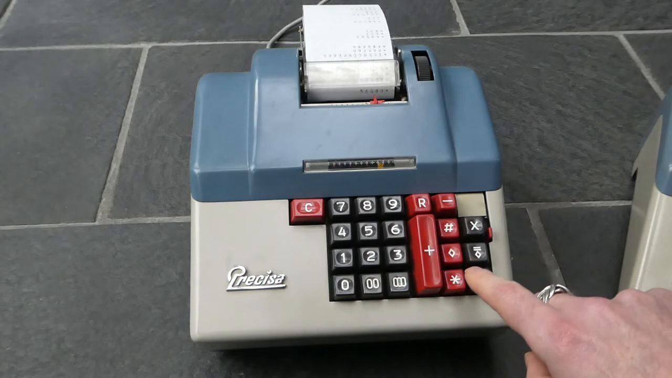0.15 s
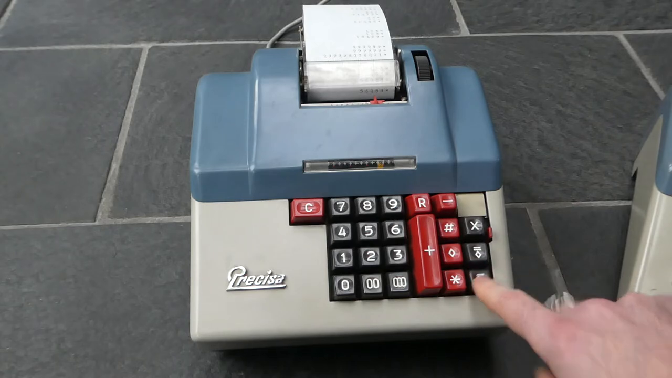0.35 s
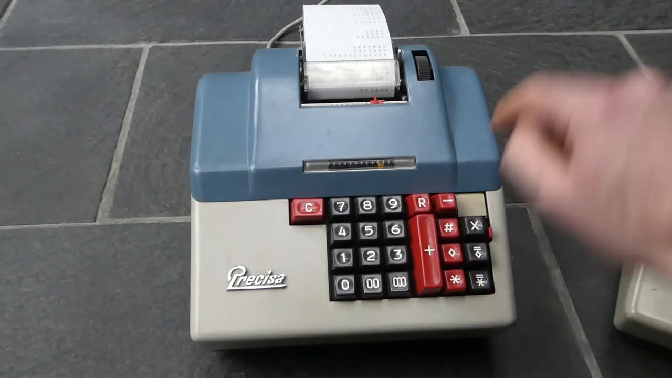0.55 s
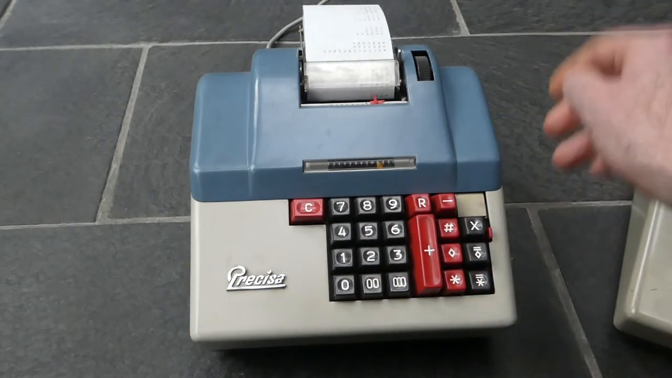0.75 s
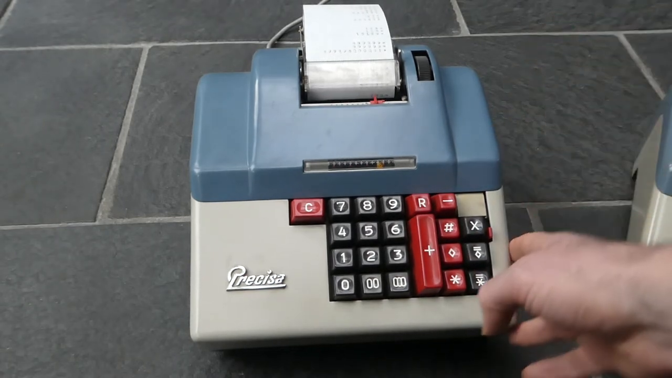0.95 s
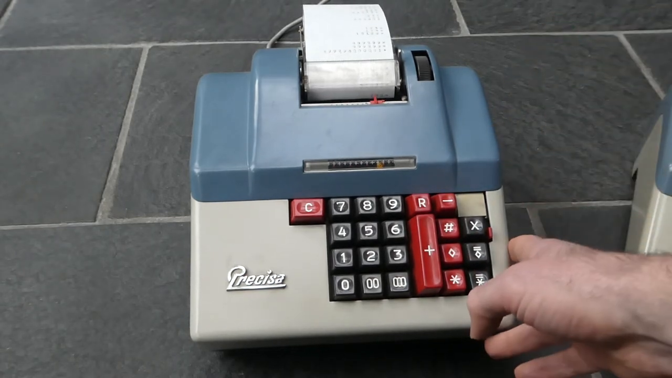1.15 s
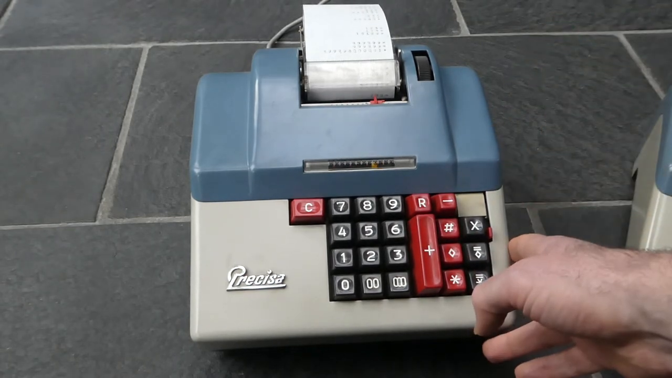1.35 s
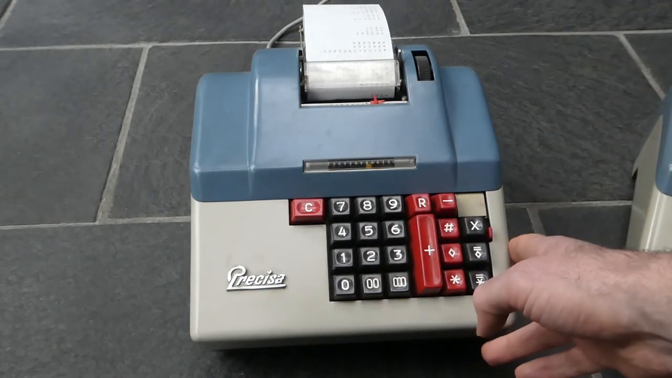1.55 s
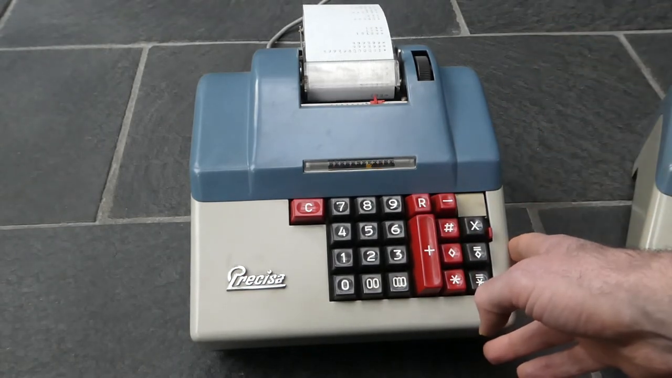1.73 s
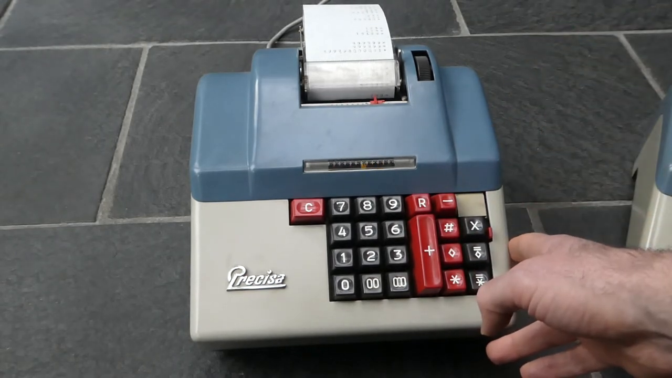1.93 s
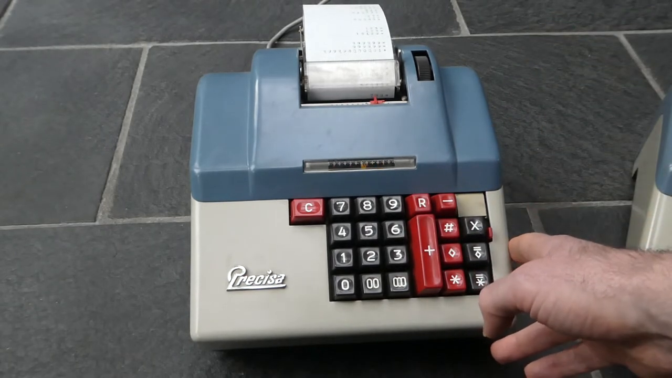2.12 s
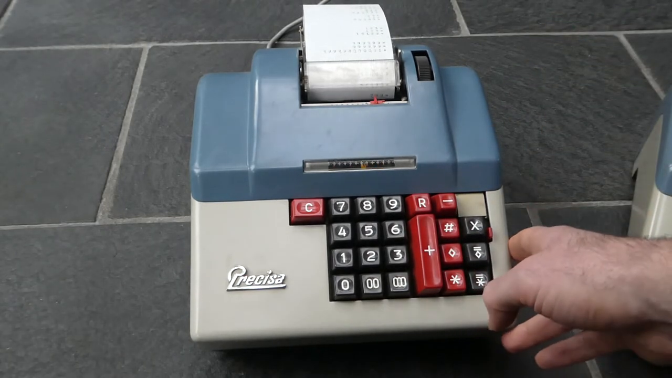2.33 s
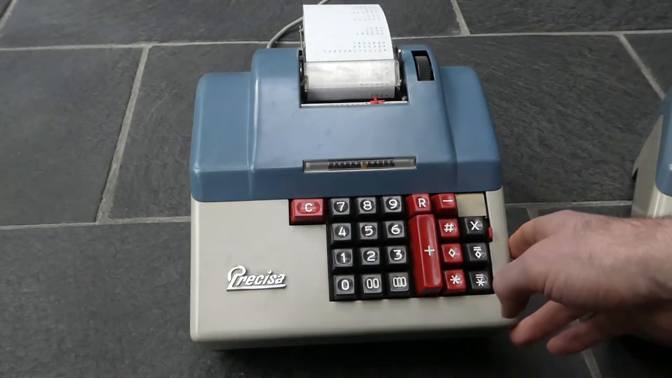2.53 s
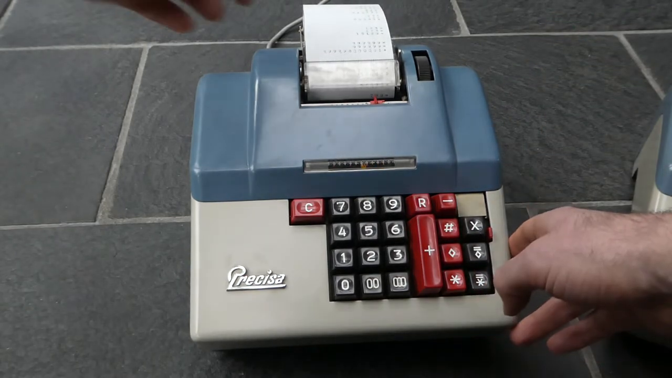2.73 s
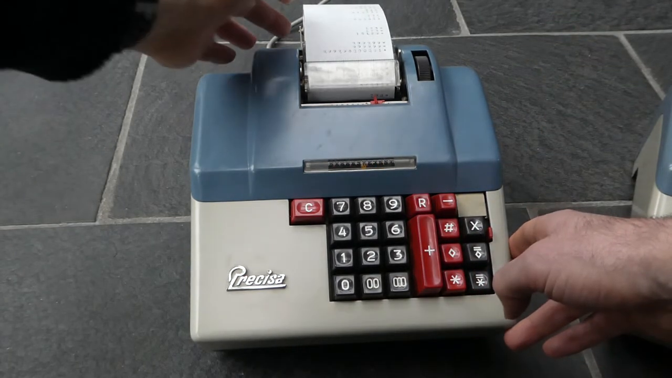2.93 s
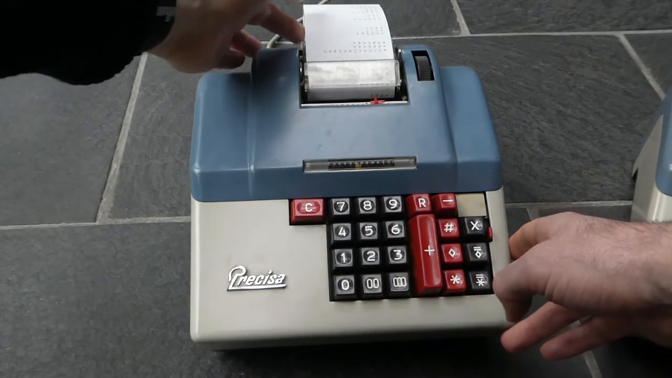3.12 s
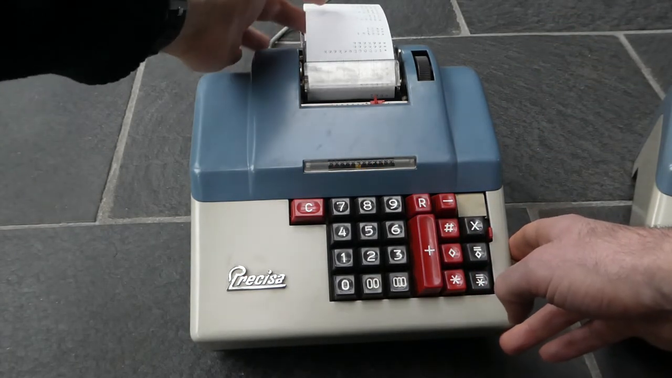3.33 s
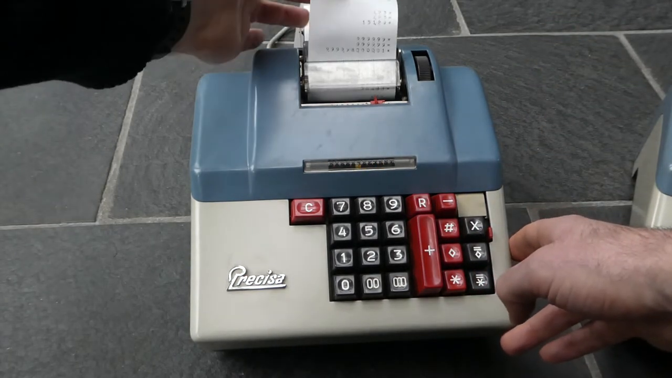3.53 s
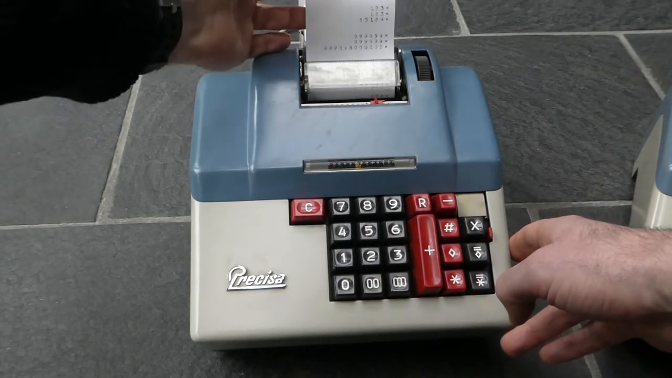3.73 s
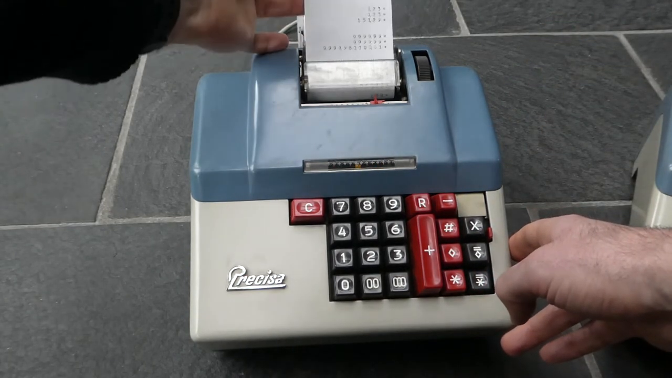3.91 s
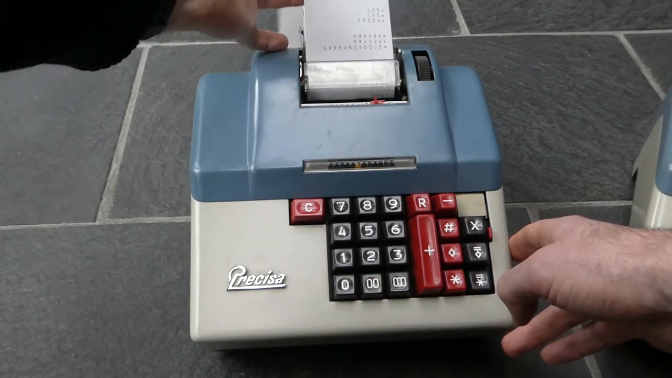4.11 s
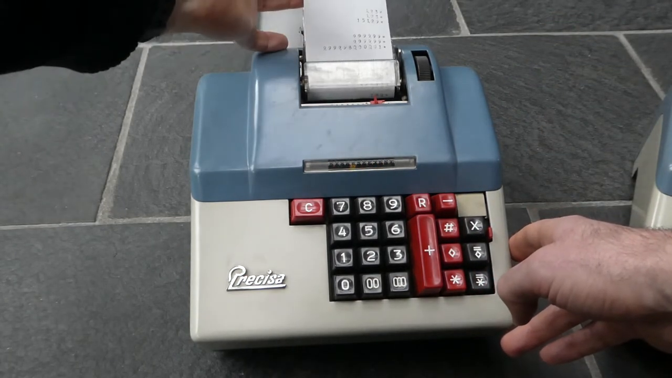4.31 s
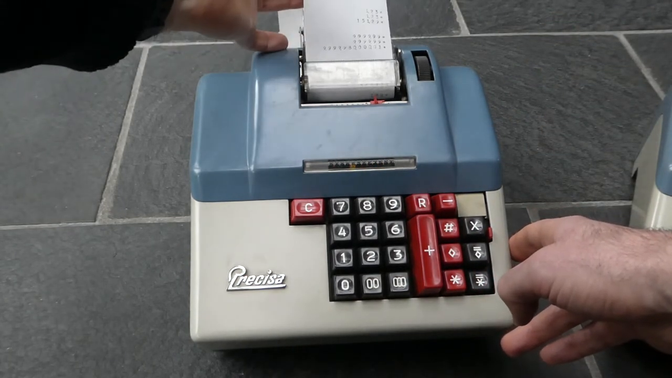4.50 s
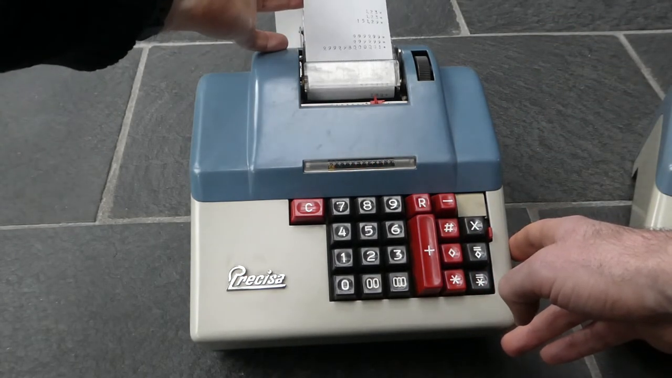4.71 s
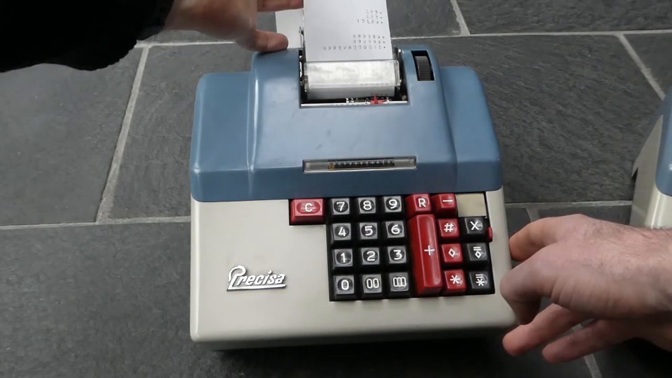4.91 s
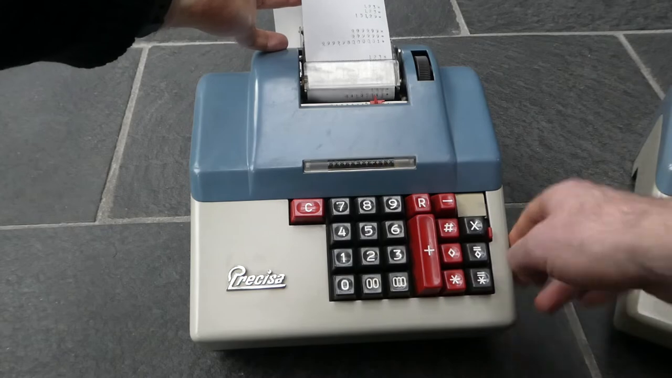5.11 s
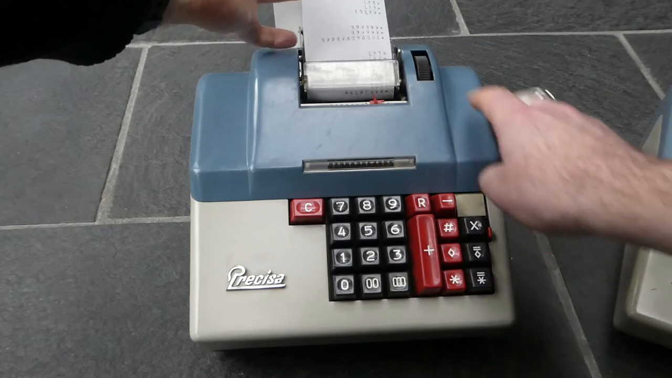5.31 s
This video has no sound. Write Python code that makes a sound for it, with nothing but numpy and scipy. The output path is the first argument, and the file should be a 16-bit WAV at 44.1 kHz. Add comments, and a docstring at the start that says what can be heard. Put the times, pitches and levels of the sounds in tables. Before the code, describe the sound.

An old electric calculator runs a long calculation on stone tiles: sudden snap, then bright dense metallic clatter in a steady galloping cycle, with grainy gear whirr, hollow case hum and short fluttering pings. It ends abruptly, leaving quickly fading reflections, faint hum and quiet room hush, with one small drop of a loose part. Heard close in stereo, reflections slightly wider.

```python
"""An electric adding machine on a stone floor runs through cycles of about a third of a second, then stops.
Levers and racks slam in short noise rattles that strike the modes of the frame; single bars ring out.
A steel pawl pings in fluttering modes, jolts swell the low tones of the case, gears whirr as grainy noise.
A hard room answers with decaying echoes over a faint, wide hush of coloured noise.
A stereo microphone pair hears it: machine in the middle, reflections and hush spread wide."""
import sys
import numpy as np
from scipy import signal
from scipy.fft import rfft, irfft
from scipy.io import wavfile

SR = 44100
rng = np.random.default_rng(int(sys.argv[2]) if len(sys.argv) > 2 else 0)


def digitize_waveform(pressure):
    """Quantize a signal to 16-bit integers and store it at the path in sys.argv[1].

    Rows of a 2-D input are taken as channels; values are limited to [-1, 1].
    """
    field = np.atleast_2d(pressure).T
    bounded = np.clip(field, -1, 1)
    quanta = np.round(bounded * 32767).astype(np.int16)
    wavfile.write(sys.argv[1], SR, quanta)


N = 240400

# distant house noise: (frequency [Hz], relative level [dB]); side gain against mid: (frequency [Hz], gain [dB])
HUSH_COLOUR, HUSH_SPREAD = [(12, -55), (40, -29), (90, -14.5), (200, -13), (297, -4.5), (361, -15),
                            (506, -11), (863, -21), (2600, -20), (2770, -15.5), (2950, -20), (3800, -23),
                            (5670, -27), (12500, -31.5), (16500, -42)], [(60, 4.5), (700, 9), (1290, 5.5), (2380, 1), (4400, -5.5)]
HUSH_MID_DB = -63.5  # rms of the mid signal
# echoes of tiles and walls: (octave centre [Hz], t60 [s], level [dB])
ROOM_OCTAVES = [(104, 0.81, -0.5), (190, 0.54, -4.5), (332, 1, -14.5), (643, 0.77, -5.5), (1340, 0.653, -8),
                (2980, 0.74, -13.5), (4970, 0.8, -13), (11600, 0.45, -15.5)]
# side gain of the reflections: (frequency [Hz], gain [dB])
REFLECTION_SPREAD = [(60, -6), (200, -25), (380, -18.5), (700, -6.5), (1290, -11.5), (8120, -13),
                     (15000, -5.5)]
# tilt of the microphone pair: (frequency [Hz], left minus right [dB])
LEAN = [(200, 1), (380, 2), (700, 0), (1290, -1.5), (4400, -.5), (8120, 1.5)]
TOP_HZ = 16000  # upper limit of the sound

# gears and motor: (time [s], whirr level [dB], case hum level [dB])
RUN = [(0.359, -35, -51), (.395, -37, -44), (.45, -36, -39), (.55, -33.5, -42), (1.0, -36.5, -41.5),
       (2.6, -38, -42), (3.3, -40.5, -44), (4.6, -37.5, -42), (5.01, -35.5, -44.5), (5.16, -36, -41.5),
       (5.21, -45, -53)]
# faint hum after the stop: (start [s], frequency [Hz], width [Hz], level [dB])
COAST = (5.15, 365, 16, -59)
# hum modes of the case: (frequency [Hz], width of each filter pass [Hz], level [dB])
CASE_MODES = [(265.7, 33, -11.5), (326.9, 49.4, -1.5), (361.3, 25, -3), (394.3, 25.3, -4.5)]
# colour of blows and gears: (frequency [Hz], relative level [dB])
METAL_COLOUR = [(260, -32), (480, 4.5), (640, 4.5), (914, 2.5), (1550, 8.5), (2330, 7), (2920, 12),
                (3710, 4.5), (4580, 4), (5600, 5), (7310, 8.5), (8600, 4), (10000, 6.5), (11400, 0),
                (12500, -6.5), (15300, -13), (16500, -60)]
# frame and lever modes: (frequency [Hz], level [dB], t60 [s])
FRAME_MODES = [(1430, -6, 0.05), (1505, 1.5, 0.03), (1770, -6, 0.05), (2134, -6, 0.02), (2920, 2, 0.035),
               (3300, 2, 0.025), (4472, 2, 0.03), (4800, -2, 0.04), (5400, 5, 0.025), (6280, 3, 0.02),
               (6700, 5, 0.025), (9700, 5, 0.012), (10800, 14, 0.006)]

# jolts that make the case boom: (loudest time [s], level [dB], pitch [Hz], swell and fade constant [s])
JOLTS = [(0.401, -33, 332, 0.0095), (0.523, -19, 348.4, 0.0086), (0.561, -23, 354, 0.017),
         (0.648, -32, 353, 0.0143), (0.696, -25.5, 329.8, 0.01), (0.731, -28.5, 339, 0.012),
         (0.766, -28, 353, 0.0068), (0.815, -33, 350, 0.012), (0.84, -30.5, 351, 0.0085),
         (0.869, -28.5, 345, 0.0098), (0.924, -29.5, 361, 0.0072), (0.962, -27.5, 350, 0.0079),
         (1.006, -23.0, 343, 0.015), (1.074, -27.5, 362, 0.019), (1.11, -30.5, 322, 0.0132),
         (1.128, -25, 346, 0.008), (1.166, -26.5, 345, 0.0082), (1.226, -31.5, 356.5, 0.008),
         (1.26, -30.5, 345, 0.015), (1.321, -30, 352, 0.016), (1.394, -26.5, 371, 0.023),
         (1.433, -30.0, 362, 0.01), (1.549, -27, 322, 0.0066), (1.63, -26.0, 332, 0.0189),
         (1.699, -23.5, 378.6, 0.0164), (1.737, -29, 362, 0.0056), (1.773, -30.0, 356, 0.0069),
         (1.796, -28, 340, 0.0094), (1.818, -34, 338, 0.015), (1.857, -29, 361, 0.0088),
         (1.89, -35, 336, 0.006), (1.928, -22.5, 349, 0.015), (1.999, -27.5, 351, 0.0091),
         (2.13, -29, 356, 0.008), (2.171, -26, 357, 0.0076), (2.248, -27.5, 333, 0.0224),
         (2.291, -32.5, 336, 0.013), (2.317, -28, 362, 0.0124), (2.36, -33, 366, 0.0085),
         (2.451, -29.5, 336, 0.0089), (2.492, -32.0, 340, 0.014), (2.559, -26, 358, 0.018),
         (2.628, -24, 371, 0.0088), (2.678, -29.5, 367, 0.011), (2.798, -31, 350, 0.011),
         (2.825, -34, 337, 0.01), (2.847, -29, 351, 0.0084), (2.868, -23.5, 336.4, 0.015),
         (2.902, -32, 337.4, 0.011), (2.931, -28.5, 360, 0.009), (3.099, -26.5, 328, 0.01),
         (3.167, -27.5, 361, 0.011), (3.247, -25, 365, 0.013), (3.293, -30, 334, 0.0088),
         (3.488, -26.5, 353.7, 0.0088), (3.559, -25, 350, 0.0093), (3.602, -31.5, 362, 0.008),
         (3.636, -31, 323, 0.013), (3.798, -26.5, 335, 0.026), (3.873, -23.5, 361, 0.0086),
         (3.929, -31, 340, 0.015), (4.102, -26, 337.7, 0.017), (4.176, -29.5, 359, 0.0074),
         (4.194, -27.5, 338.4, 0.012), (4.214, -30, 370, 0.008), (4.266, -29, 354, 0.0066),
         (4.357, -27, 347, 0.0072), (4.413, -27.5, 336, 0.011), (4.475, -27.5, 362, 0.012),
         (4.516, -30, 330, 0.0112), (4.579, -31, 367, 0.0085), (4.715, -24, 343, 0.0089),
         (4.839, -22, 352, 0.0081), (4.854, -29.5, 383, 0.015), (4.919, -27.0, 350, 0.0087),
         (4.966, -30.5, 348, 0.015), (4.993, -31.0, 356, 0.009), (5.035, -25, 323.5, 0.0117),
         (5.053, -34, 349, 0.0068), (5.102, -30.5, 376, 0.008), (5.126, -30.5, 353, 0.0092)]
# colour of the thud into the floor: (frequency [Hz], relative level [dB])
THUD_COLOUR = [(12, -48), (20, -32), (59, -23), (108, -6.5), (187, -7), (250, 0.5), (290, 0.5), (480, -46)]
THUD_DB = -58.5  # rms of all thuds over the whole scene

# pawl pings: (time [s], level [dB], lowest mode over middle [dB], upper modes over middle [dB])
PINGS = [(1.1714, -32.5, -6, -26), (1.485, -31.5, 4, -6), (1.79, -35, 3.5, 0), (2.0996, -63, -14, -12),
         (2.411, -31.5, -5, -3), (2.7237, -31, -16, -6), (3.027, -27.5, -26.5, -4),
         (3.3404, -30.5, -13, 1.5), (3.6583, -30.5, -11, 0.5), (3.9634, -27, -10, -5),
         (4.2692, -31.5, -14, -6), (4.56, -38, -3.5, 7)]
# modes of the pawl: (frequency [Hz], level [dB], t60 [s])
PAWL_MODES = [(4646, 1, 0.14), (6510, -0.5, 0.058), (7830, 0.5, 0.12), (7760, -5.5, 0.12),
              (8900, -20, 0.08), (11210, -3, 0.093), (11340, 0, 0.21), (12700, -5, 0.085)]
BUZZ, BUZZ_HZ = .35, 150  # loose parts flutter a ring: relative depth, upper rate [Hz]

# knocks that set one bar ringing, low, middle and high bars: (time [s], level [dB], pitch [Hz])
LOW_KNOCKS = [(0.3723, -25, 2337), (0.531, -24, 1450), (0.5914, -17.5, 1798), (0.6913, -33.5, 1682),
              (0.937, -25, 1530), (0.9935, -32, 1610), (1.308, -27, 1550), (1.6878, -47, 1610),
              (1.9263, -31, 1470), (2.0015, -32, 1620), (2.5506, -22, 1820), (2.6167, -25.5, 2050),
              (2.8552, -23, 2290), (2.93, -33, 1940), (3.2417, -28, 1582), (3.557, -34, 1800),
              (3.8753, -37, 1590), (4.1633, -25, 1340), (4.472, -38, 1310), (4.55, -28, 1740),
              (4.672, -26, 1726), (4.7863, -30, 2040), (4.8317, -27, 1350), (4.9245, -15, 2065),
              (5.1085, -21, 2202), (5.14, -31, 2137)]
BAR_KNOCKS = [(0.3688, -29, 3270), (0.391, -19, 2821), (0.6202, -16, 3200), (0.8213, -23, 3240),
              (0.9867, -24, 3100), (1.0677, -20, 2940), (1.2333, -31, 2820), (1.2977, -26, 2914),
              (1.385, -16, 2917), (1.608, -21, 2870), (1.692, -21, 3010), (1.9138, -35, 2960),
              (2.0027, -15, 2926), (2.2296, -25, 2920), (2.3164, -22, 2880), (2.4985, -28, 2840),
              (2.5504, -22.5, 2640), (2.6307, -17, 2870), (2.8442, -24.5, 2873), (2.931, -15.5, 2903),
              (3.0268, -25, 2980), (3.1, -24.5, 2900), (3.1635, -21, 2900), (3.24, -21.5, 2873),
              (3.5596, -21.5, 2960), (3.79, -20.5, 3130), (3.874, -31.5, 2870), (4.087, -23, 2880),
              (4.1767, -24, 3020), (4.3907, -23, 2820), (4.4785, -25, 2900), (4.5503, -30, 2892),
              (4.672, -20, 3313), (4.7329, -22.5, 2840), (4.7863, -20, 2920), (4.8305, -28, 3160),
              (4.925, -16.5, 3350), (4.9626, -22, 3000), (5.1074, -18.5, 2865), (5.14, -25, 3350)]
HIGH_KNOCKS = [(0.3688, -31, 4360), (0.486, -24, 4370), (0.5913, -25, 4380), (0.6282, -15.5, 4570),
               (0.6901, -21, 4500), (0.932, -18.5, 4240), (0.9954, -28, 4500), (1.0617, -28, 4400),
               (1.145, -24, 4560), (1.2523, -17, 4520), (1.2992, -18.5, 4530), (1.5566, -31, 4550),
               (1.8669, -27, 4800), (1.9243, -24, 4550), (2.1742, -21, 4900), (2.2321, -24, 4473),
               (2.49, -26, 4800), (2.5509, -27, 4600), (2.6297, -31, 4500), (2.7918, -27, 4700),
               (3.0986, -25.5, 4700), (3.162, -22, 4490), (3.4179, -31, 4800), (3.4653, -26, 4490),
               (3.5496, -34, 4360), (3.7327, -22.5, 4650), (4.0335, -23, 4720), (4.0968, -18.5, 4530),
               (4.3418, -27, 4540), (4.4026, -16.5, 4600), (4.4715, -32, 4400), (4.6436, -28, 4700),
               (4.672, -22, 4400), (4.7089, -21, 4600), (4.924, -20.5, 4990), (4.9594, -23, 4400)]
# the three sets of bars: (knocks, t60 [s], swell [s])
KNOCKS = [(LOW_KNOCKS, .035, .0025), (BAR_KNOCKS, .03, .002), (HIGH_KNOCKS, .028, .002)]
# a neighbouring bar answers: level [dB], greatest relative pitch shift, longest delay [s]
TWIN_DB, TWIN_APART, BOUNCE_S = -7, .035, .004
# finger on the key, and a part dropping to rest: (frequency [Hz], level [dB], t60 [s])
KEY_RING, SETTLE_RING = [(600, -57, .03), (1300, -58, .03), (2400, -64, .03), (4100, -67, .03)], [(365, -50, .06), (670, -47, .045), (1080, -48, .04),
                                           (1490, -51, .04)]
TOUCH_S, KEY_S = .3535, .3675  # the finger touches; the key trips the motor, no blow sounds before

# main blows of each kind, and the drop to rest after the stop: (loudest time [s], middle level [dB], rise [s])
HAMMERS = [(.692, -21, 0.0049), (.9965, -18, 0.0054), (1.3108, -20.5, 0.0091), (1.6196, -21, .005),
           (1.9255, -19.5, 0.0028), (2.2391, -18.5, 0.0027), (2.551, -19.5, 0.0023), (2.857, -18, .003),
           (3.162, -20, 0.0017), (3.4796, -19, .003), (3.797, -20, 0.0056), (4.0976, -20.5, .004),
           (4.4035, -20.5, 0.002), (4.7094, -20, .002), (5.0284, -24, 0.0042)]
RACKS = [(.4587, -36.5, 0.0028), (.769, -34, 0.0044), (1.0706, -22.5, 0.005), (1.3847, -20.5, 0.0031),
         (1.6927, -23, 0.0033), (2.004, -23, 0.0032), (2.3204, -25, 0.011), (2.6311, -21.5, 0.0034),
         (2.9333, -22.5, 0.0039), (3.2442, -25, 0.0059), (3.5616, -23.5, 0.0066), (3.8755, -22.5, 0.0028),
         (4.176, -22.5, 0.006), (4.4787, -22.5, 0.00255), (4.786, -22.5, 0.0034)]
PAWLS = [(.860, -27.5, 0.025), (1.1722, -25, 0.01), (1.4873, -29, 0.016), (1.788, -25.5, 0.015),
         (2.0998, -27, 0.0085), (2.418, -29, 0.009), (2.7242, -28.5, 0.018), (3.0292, -28, 0.0029),
         (3.3425, -28, 0.0019), (3.6598, -30.5, 0.0021), (3.9643, -31, 0.00083), (4.2696, -28, 0.019),
         (4.5691, -26.5, 0.0046)]
RETURNS = [(.9325, -20, 0.0018), (1.2349, -23.5, 0.0023), (1.554, -20.5, 0.0048), (1.863, -22.5, 0.0095),
           (2.1763, -21, 0.00108), (2.4924, -24, 0.0025), (2.7942, -24.5, 0.00059), (3.1003, -24, 0.0042),
           (3.4156, -28.5, 0.0019), (3.733, -27, .001), (4.0332, -25, 0.00068), (4.342, -24, 0.0061),
           (4.6443, -23, 0.0009), (4.9609, -22.5, 0.0014)]
SLIDES = [(.393, -24, 0.0024), (.405, -29, .004), (.527, -25.5, 0.011), (.562, -25.5, 0.022),
          (.6285, -22.5, 0.0118), (1.250, -25.5, .008), (2.135, -29, 0.044), (4.835, -24.5, 0.008),
          (5.098, -28, 0.0087)]
SNAPS = [(.3693, -18, 0.0011), (.3737, -17.5, 0.0013), (.4867, -22, .001), (.5928, -13, 0.00084),
         (.8227, -23.5, 0.0027), (4.167, -26, 0.00086), (4.6745, -17.5, 0.00194), (4.7342, -23.5, .002),
         (4.9017, -32, 0.0023), (5.1105, -18.5, 0.0025), (5.1423, -21.5, 0.0018)]
CLUNKS = [(4.9262, -20, .002)]
SETTLES = [(5.3555, -58, .002)]
# small strokes between the main blows: (loudest time [s], middle level [dB])
COCKS = [(.6834, -28.5), (.9834, -23.5), (1.2989, -25.5), (1.6065, -22.5), (1.9132, -23), (2.2265, -24),
         (2.5385, -29), (2.8442, -24.5), (3.1492, -28), (3.466, -29.5), (3.785, -25.5), (4.086, -28),
         (4.391, -27), (4.6964, -30), (5.015, -29)]
DRAGS = [(.797, -23.5), (1.106, -25), (1.418, -24.5), (1.730, -25.5), (2.039, -27.5), (2.354, -31.5),
         (2.659, -25), (2.966, -26.5), (3.277, -27), (3.593, -29), (3.904, -25.5), (4.211, -28),
         (4.511, -27.5), (4.820, -41)]
TICKS = [(.5505, -23), (.758, -33.5), (.963, -29), (1.140, -26.5), (1.266, -37), (1.452, -33), (1.585, -33),
         (1.763, -31), (1.8555, -29), (1.8925, -30.5), (2.0735, -29), (2.207, -34), (2.3885, -28.5),
         (2.522, -32.5), (2.692, -26), (2.823, -31), (2.997, -29), (3.128, -32), (3.310, -30.5),
         (3.447, -35), (3.630, -30), (3.7645, -35), (3.936, -34), (4.065, -33), (4.242, -30), (4.372, -34),
         (4.546, -29)]
# sound of each kind: (low over middle [dB], treble over middle [dB], pitch of nearest modes [Hz],
# ring over middle [dB], fall [s])
HAMMER = (-4.5, -3, 4600, -5.5, .0055)
RACK = (-1.5, 0, 2900, -12.5, .005)
PAWL_BLOW = (-2.5, 2.5, 9882.5, 8.5, .006)
RETURN = (-5, 0, 4603, -10.5, .009)
SLIDE = (-3, -1.5, 3398.5, -6, .01)
SNAP = (-5.5, 1, 1816, -1, .0025)
CLUNK = (1.5, 1, 2072, -2, .003)
SETTLE = (8, -10, 1427, -8, .006)
COCK = (-5.5, 4.5, 4760, -3.5, .007)
DRAG = (-6, -2, 1810, -0.5, .007)
TICK = (-5, 0, 1422, -5, 0.01)
# (main blows, sound)
MAIN = [(HAMMERS, HAMMER), (RACKS, RACK), (PAWLS, PAWL_BLOW), (RETURNS, RETURN), (SLIDES, SLIDE),
        (SNAPS, SNAP), (CLUNKS, CLUNK), (SETTLES, SETTLE)]
# (small strokes, sound, rise [s])
SMALL = [(COCKS, COCK, 0.0012), (DRAGS, DRAG, 0.005), (TICKS, TICK, 0.00096)]
# strokes linked to a main blow: (main blows, sound, mean lag [s], mean middle level [dB], rise [s])
TIED = [(RACKS, TICK, -0.0087, -29.5, 0.0014), (RETURNS, TICK, 0.009, -28.5, 0.0017)]
LINKED_SCATTER_DB, LINKED_SCATTER_S = 2.0, .0015  # standard deviations
RING_SCATTER_DB = 2.5  # standard deviation
PITCH_SCATTER, PING_SCATTER = .015, .003  # relative: greatest shift in blows, standard deviation in pings
BLOW_LOW_HZ = 980  # rattles carry little below this


def undb(db):
    """Amplitude of a level in dB."""
    return 10 ** (np.asarray(db) / 20)


def level(x, db):
    """Scale a signal to an rms level in dB."""
    return x * undb(db) / np.sqrt(np.mean(x ** 2))


def colour(x, points):
    """Causal minimum-phase filter through (Hz, dB) points, from the cepstrum of the log gain."""
    size = 4096
    hz, db = np.transpose(points)
    bins_hz = np.arange(size // 2 + 1) * SR / size
    log_gain = np.interp(np.log(bins_hz + 1), np.log(hz), db) * np.log(10) / 20
    cepstrum = irfft(log_gain)
    # fold the cepstrum onto positive time
    cepstrum[1:size // 2] *= 2
    cepstrum[size // 2 + 1:] = 0
    impulse = irfft(np.exp(rfft(cepstrum)))
    return signal.fftconvolve(x, impulse)[:len(x)]


def butter(x, order, hz, kind):
    """Butterworth filter of one signal."""
    return signal.sosfilt(signal.butter(order, hz, kind, fs=SR, output="sos"), x)


def ring(x, hz, t60):
    """One decaying mode, a complex pole; an impulse of 1 rings in an envelope that starts at 1."""
    pole = np.exp(2j * np.pi * hz / SR - np.log(1000) / (t60 * SR))
    return signal.lfilter([1], [1, -pole], x).imag


def band(x, hz, width):
    """Resonant band around one frequency."""
    return signal.lfilter(*signal.iirpeak(hz, hz / width, fs=SR), x)


def split(x, low_hz, high_hz):
    """Low, middle and high part."""
    return butter(x, 2, low_hz, "low"), butter(x, 2, (low_hz, high_hz), "band"), butter(x, 2, high_hz, "high")


def add(line, s, piece):
    """Mix a piece into a line from a time in seconds."""
    i = int(s * SR)
    line[..., i:i + piece.shape[-1]] += piece[..., :N - i]


def scatter(t60, onset, size):
    """A dense swarm of echoes: noise that rises over the onset and decays, with energy 1."""
    t = np.arange(size) / SR
    noise = rng.standard_normal(len(t)) * np.minimum(t / onset, 1) * 1000. ** (-t / t60)
    return noise / np.sqrt(np.sum(noise ** 2))


def strike(line, s, hz, db, t60, swell):
    """A short push rings a few modes: each swells linearly, then decays exponentially."""
    t = np.arange(int(.15 * SR))[:, None] / SR
    envelope = np.minimum(t / swell, 1) * 1000. ** (-t / t60)
    modes = undb(db) * envelope * np.sin(2 * np.pi * hz * t)
    add(line, s, modes.sum(axis=1))


def chatter(grain_db, grain_s):
    """Dense metal contacts: noise in grains of uneven size, in the colour of the works; rms 1."""
    grains = undb(grain_db * np.minimum(rng.exponential(size=N), 3.5))
    size = np.repeat(grains, max(int(grain_s * SR), 1))[:N]
    return level(colour(size * rng.standard_normal(N), METAL_COLOUR), 0)


def hush():
    """Distant house noise: independent mid and side noise, wide in the bass and middle."""
    mid = colour(rng.standard_normal(N), HUSH_COLOUR)
    side = colour(colour(rng.standard_normal(N), HUSH_COLOUR), HUSH_SPREAD)
    return undb(HUSH_MID_DB) / mid.std() * np.array([mid + side, mid - side])


def room(x):
    """Tiles and walls: reflections pile up into a tail that decays at its own rate in each octave."""
    tail = 0
    for hz, t60, db in ROOM_OCTAVES:
        echoes = scatter(t60, 0.0034, size=SR // 2)
        tail = tail + undb(db) * butter(echoes, 2, (hz / np.sqrt(2), hz * np.sqrt(2)), "band")
    return signal.fftconvolve(x, tail)[:N]


def teeth(rate):
    """Loose parts tick at random, each frame mode on its own at the given mean rate per second; rms 1."""
    shape = (len(FRAME_MODES), N)
    ticks = (rng.random(shape) < rate / SR) * rng.standard_normal(shape)
    return level(sum(level(ring(x, hz, t60), db) for x, (hz, db, t60) in zip(ticks, FRAME_MODES)), 0)


def drive():
    """Gears whirr as grainy noise, loose parts tick, case modes hum; a faint hum is left after the stop."""
    t = np.arange(N) / SR
    s, whirr_db, hum_db = np.transpose(RUN)
    running = (t > s[0] + .01) * np.exp(-np.maximum(t - 5.15, 0) / 0.051)
    case_noise, hiss_noise, coast_noise = rng.standard_normal((3, N))
    hum = sum(undb(db) * band(band(case_noise, hz, width), hz, width) for hz, width, db in CASE_MODES)
    hum = level(hum, 0)
    # each band of the whirr has its own grains
    whirr = sum(split(chatter(3, 0.0025), 2500, 6000)[k] for k in range(3))
    whirr = whirr + undb(-9) * teeth(120)
    # bearings add a thin hiss on top
    whirr = whirr + level(band(hiss_noise, 15000, 4000), -16.0)
    start, hz, width, db = COAST
    coast = np.clip((t - start) / 0.078, 0, 1) * level(band(coast_noise, hz, width), db)
    whirr = undb(np.interp(t, s, whirr_db)) * whirr
    hum = undb(np.interp(t, s, hum_db)) * hum
    return running * (whirr + hum) + coast


def case():
    """Jolts make the hollow case swell and fade in low tones, and thud into the floor as short noise."""
    boom, thud = np.zeros(N), np.zeros(N)
    t = np.arange(-.06 * SR, .06 * SR) / SR
    for s, db, hz, length in JOLTS:
        add(boom, s + t[0], undb(db) * np.exp(-2 * (t / length) ** 2) * np.sin(2 * np.pi * hz * t))
        add(thud, s + t[0], undb(db) * np.exp(-(t / 0.0072) ** 2))
    return boom + level(colour(thud * rng.standard_normal(N), THUD_COLOUR), THUD_DB)


def pawl():
    """A thin steel part rings on after its snap, held a little differently each time."""
    out = np.zeros(N)
    hz, mode_db, t60 = np.transpose(PAWL_MODES)
    group = np.digitize(hz, (5500, 9500))  # lowest, middle, upper
    bends = rng.standard_normal((len(PINGS), len(PAWL_MODES)))
    for (s, db, lowest_db, upper_db), bend in zip(PINGS, bends):
        ping_db = db + mode_db + np.array([lowest_db, 0, upper_db])[group]
        strike(out, s, hz * (1 + PING_SCATTER * bend), ping_db, t60, .0003)
    return out


def flutter(x):
    """Parts leaning on a ringing piece shake its loudness with slow noise."""
    shake = level(butter(rng.standard_normal(N), 2, BUZZ_HZ, "low"), 0)
    return x * (1 + BUZZ * shake) / np.hypot(1, BUZZ)


def knocks():
    """Single bars ring out of the rattle; first a finger meets the key, after the stop a loose part drops."""
    out = np.zeros(N)
    for table, t60, swell in KNOCKS:
        for (s, db, hz), (apart, late) in zip(table, rng.random((len(table), 2))):
            strike(out, s, hz, db, t60, swell)
            # a neighbouring bar answers a little late, at a nearby pitch
            twin_hz = hz * (1 + TWIN_APART * (2 * apart - 1))
            strike(out, s + BOUNCE_S * late, twin_hz, db + TWIN_DB, t60, swell)
    strike(out, TOUCH_S, *np.transpose(KEY_RING), 0.00095)
    strike(out, SETTLES[0][0], *np.transpose(SETTLE_RING), 0.0011)
    return out


def strokes():
    """List every blow: main ones, small ones, and those their linkage drags along, never quite alike."""
    rows = [row + sound for table, sound in MAIN for row in table]
    rows += [(s, db, rise) + sound for table, sound, rise in SMALL for s, db in table]
    for table, sound, lag, db, rise in TIED:
        for row in table:
            late, loud = rng.standard_normal(size=2) * (LINKED_SCATTER_S, LINKED_SCATTER_DB)
            rows.append((row[0] + lag + late, db + loud, rise) + sound)
    return rows


def blows(rows):
    """Each blow is a short noise rattle that swells and falls, and strikes the modes near its own pitch."""
    t = np.arange(int(.12 * SR)) / SR
    lead = int(.02 * SR)
    gates, rings = np.zeros((3, N)), np.zeros(N)  # gates hold power in three bands
    modes_hz = np.array(FRAME_MODES)[:, 0]
    late = rng.random((len(rows), len(FRAME_MODES)))
    luck = rng.standard_normal((len(rows), len(FRAME_MODES)))
    for (s, db, rise, low_db, high_db, hz, ring_db, fall), sign, wait in zip(rows, luck, late):
        after = np.maximum(t - rise, 0)
        # quick first contact, a swell to the top, then parts settling
        swell = np.minimum(.2 + t / .0014, 1) * np.minimum(.3 + .7 * t / rise, 1)
        settling = 0.51 * np.exp(-(after / fall) ** 2) + 0.33 * np.exp(-after / (3 * fall))
        # levers already scrape on their way in
        scrape = .12 * np.exp((t[:lead] - t[lead]) / .006)
        shape = np.r_[scrape, swell * settling]
        shape = shape * (s - rise + np.arange(-lead, len(t)) / SR >= KEY_S)
        band_db = db + np.array([[low_db], [0], [high_db]])
        add(gates, s - rise - t[lead], undb(band_db) ** 2 * shape ** 2)
        near = np.exp(-(np.log(modes_hz / hz) / .045) ** 2) + .09 * sign
        # the parts are met one after another around the top of the rattle
        for (mode_hz, mode_db, t60), share, part in zip(FRAME_MODES, near, wait):
            bent_hz = mode_hz * (1 + PITCH_SCATTER * (2 * part - 1))
            wave = np.sin(2 * np.pi * bent_hz * t) * 1000. ** (-t / t60)
            wave_db = db + ring_db + mode_db + RING_SCATTER_DB * sign[0]
            add(rings, s + fall * (part - .3), undb(wave_db) * share * wave)
    parts = [level(part, 0) for part in split(chatter(1.5, .0008), 3500, 7000)]
    rattle = (np.sqrt(gates) * parts).sum(axis=0)
    return butter(rattle, 2, BLOW_LOW_HZ, "high") + rings


def scene():
    """The machine in the middle, its reflections to the sides, the hush behind."""
    machine = drive() + case() + flutter(pawl()) + knocks() + blows(strokes())
    mid = machine + room(machine)
    # near surfaces and the room reach the two microphones differently
    near_surfaces = signal.fftconvolve(machine, scatter(.25, .004, size=SR // 5))[:N]
    side = colour(near_surfaces + undb(6) * room(machine), REFLECTION_SPREAD)
    left = colour(mid + side, [(hz, db / 2) for hz, db in LEAN])
    right = colour(mid - side, [(hz, -db / 2) for hz, db in LEAN])
    return np.array([left, right]) + hush()


def record(dry):
    """Both channels end steeply at 16 kHz: an elliptic low-pass."""
    return signal.sosfilt(signal.ellip(10, .2, 70, TOP_HZ, fs=SR, output="sos"), dry)


dry = scene()
out = record(dry)
digitize_waveform(out)
```